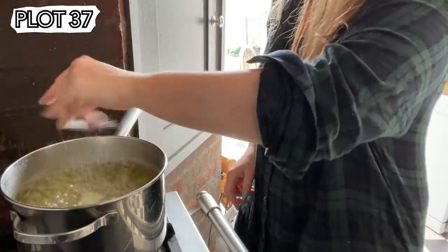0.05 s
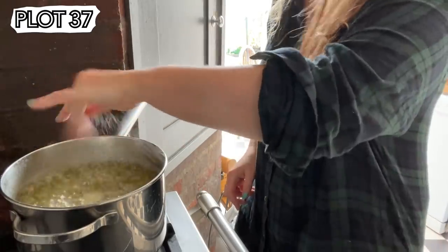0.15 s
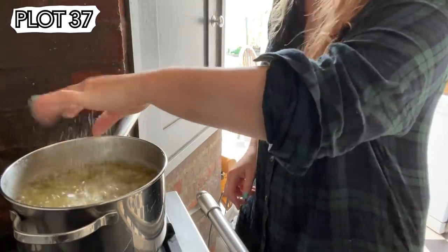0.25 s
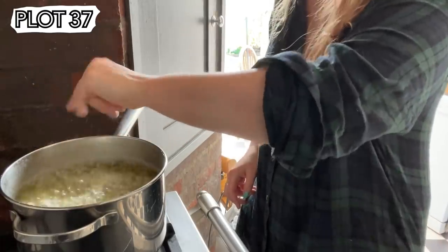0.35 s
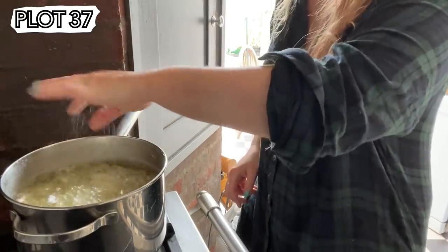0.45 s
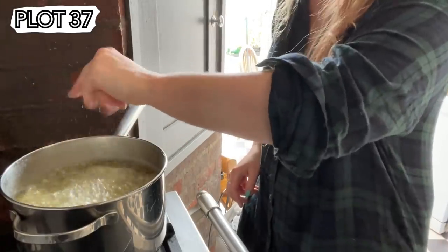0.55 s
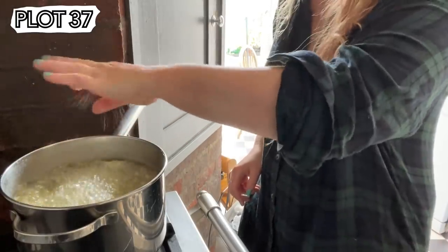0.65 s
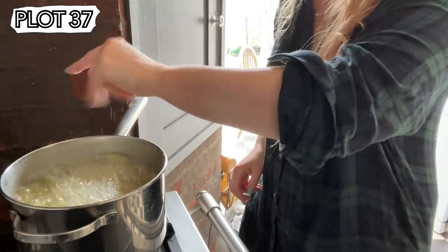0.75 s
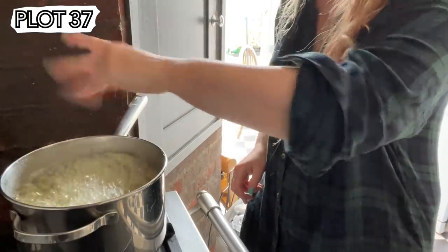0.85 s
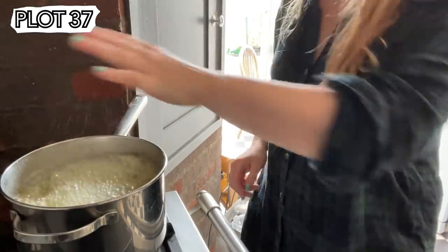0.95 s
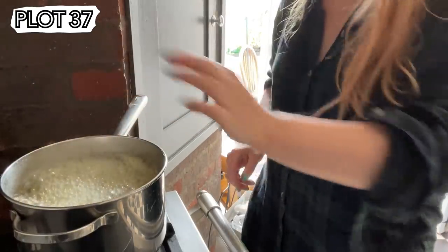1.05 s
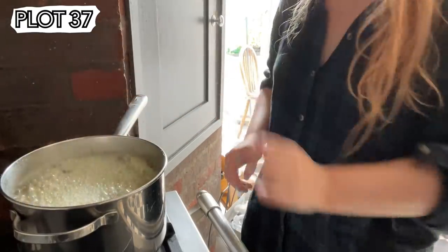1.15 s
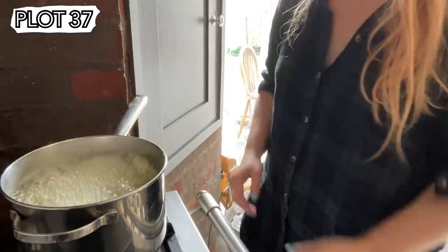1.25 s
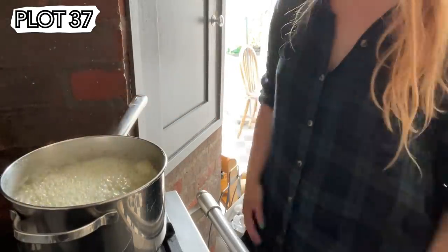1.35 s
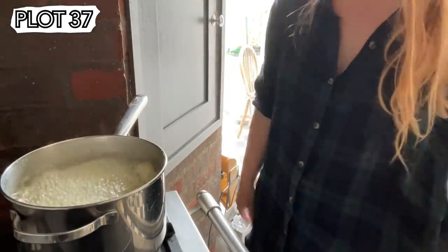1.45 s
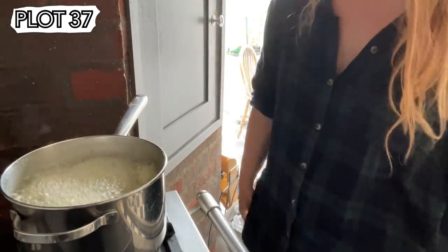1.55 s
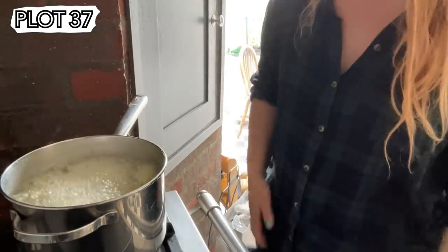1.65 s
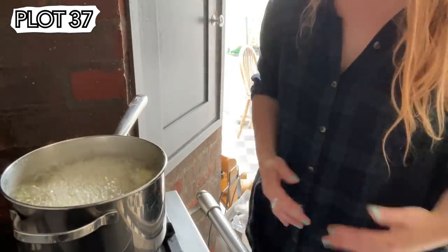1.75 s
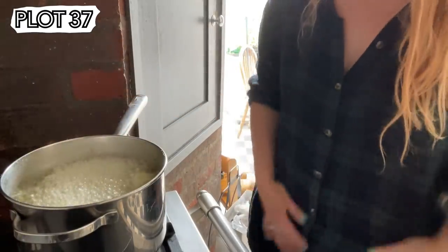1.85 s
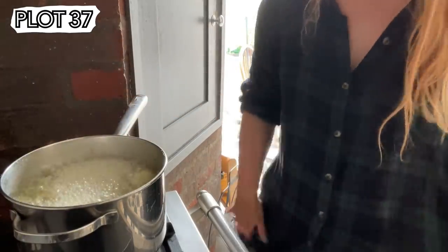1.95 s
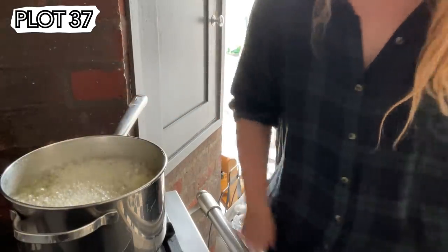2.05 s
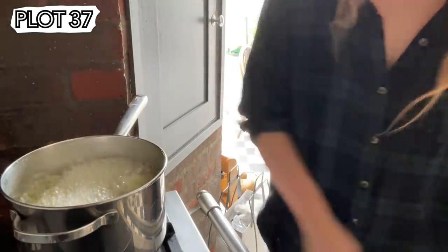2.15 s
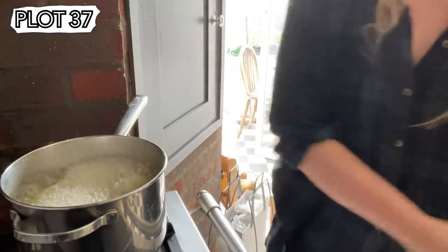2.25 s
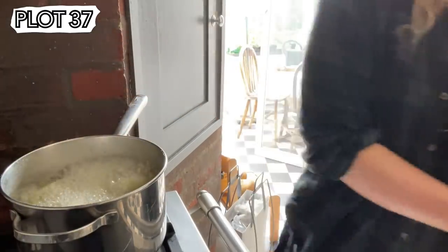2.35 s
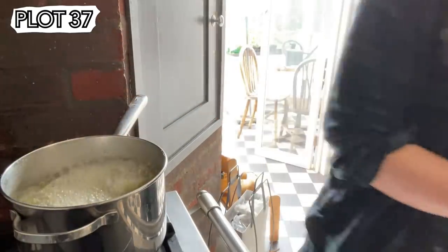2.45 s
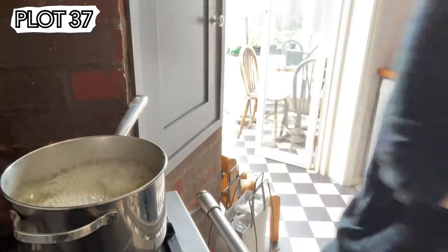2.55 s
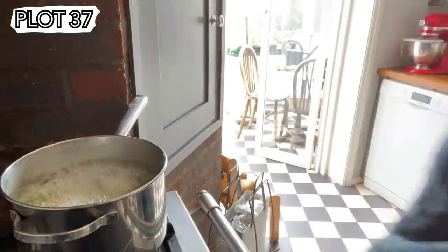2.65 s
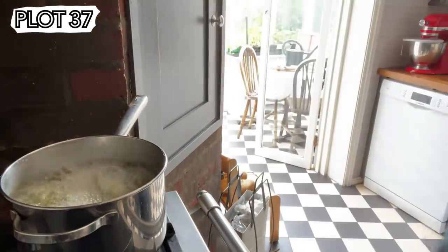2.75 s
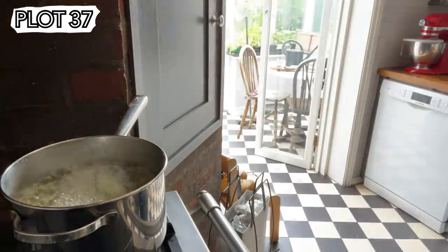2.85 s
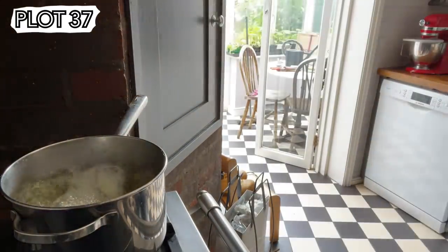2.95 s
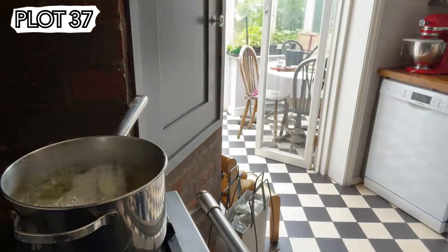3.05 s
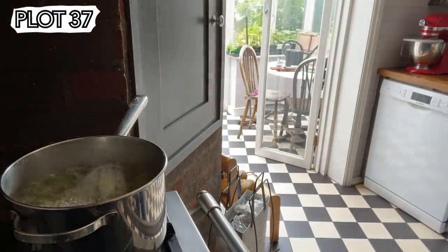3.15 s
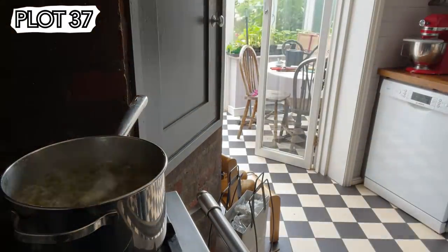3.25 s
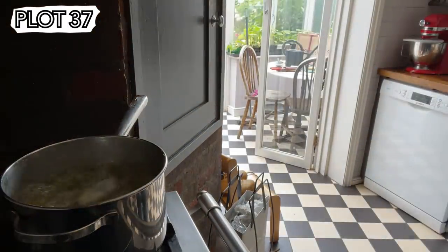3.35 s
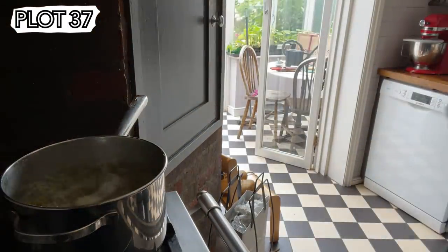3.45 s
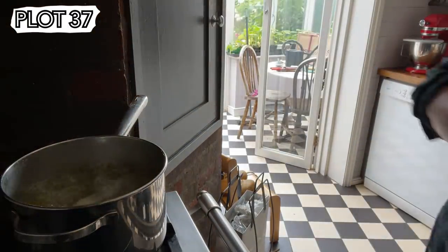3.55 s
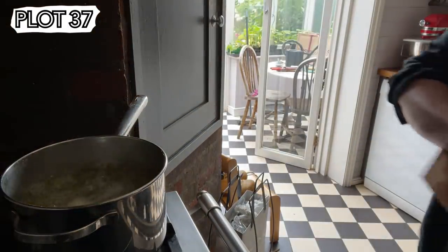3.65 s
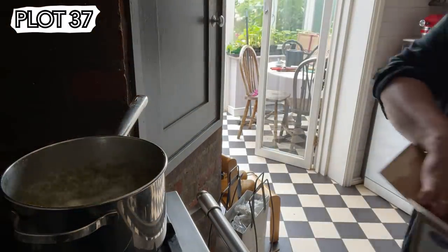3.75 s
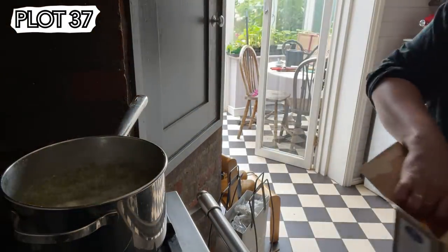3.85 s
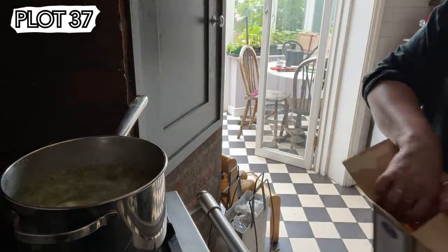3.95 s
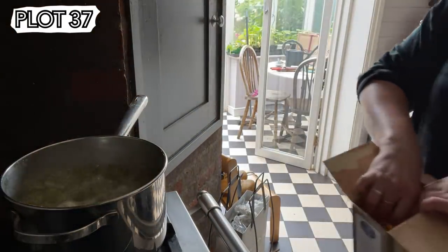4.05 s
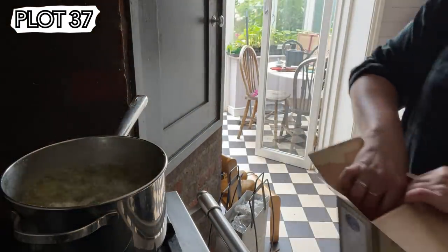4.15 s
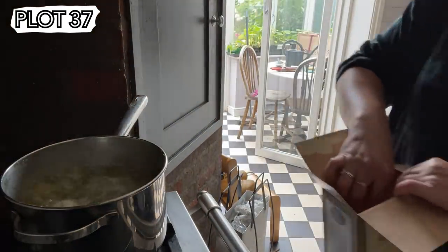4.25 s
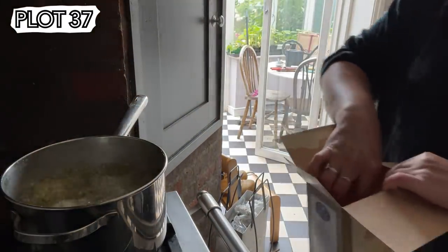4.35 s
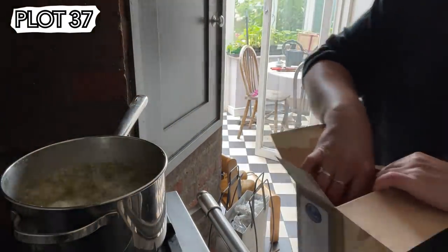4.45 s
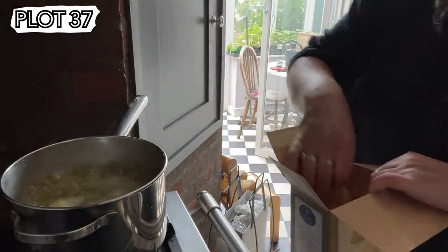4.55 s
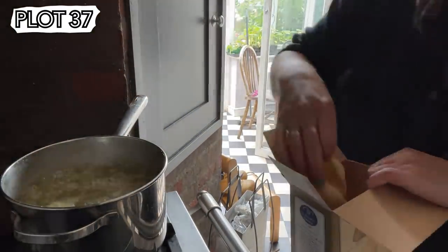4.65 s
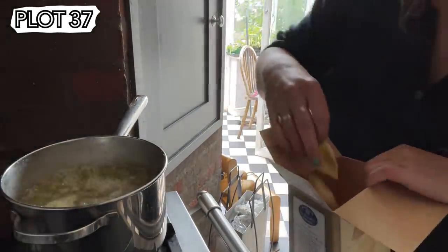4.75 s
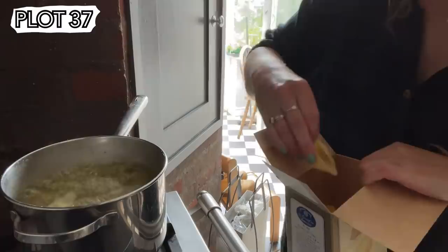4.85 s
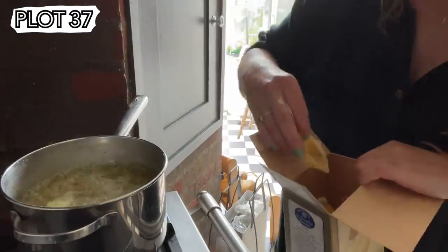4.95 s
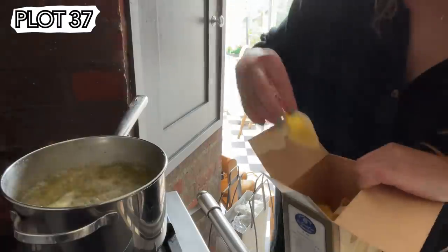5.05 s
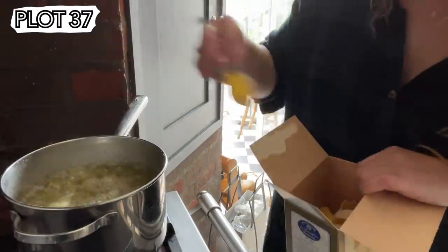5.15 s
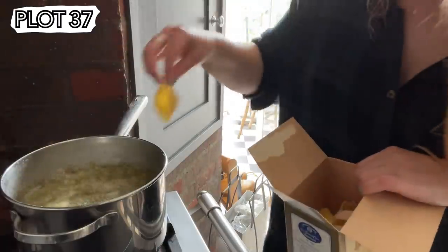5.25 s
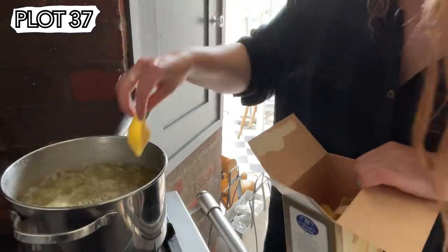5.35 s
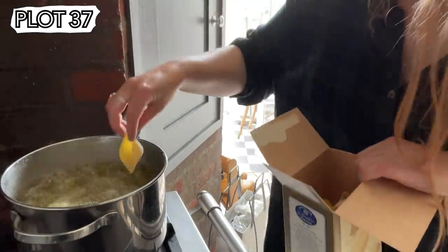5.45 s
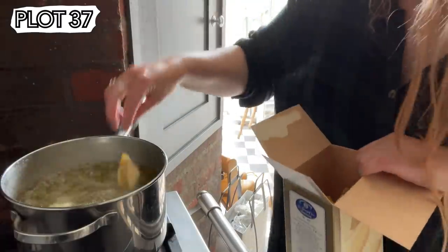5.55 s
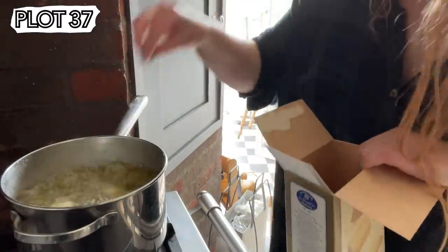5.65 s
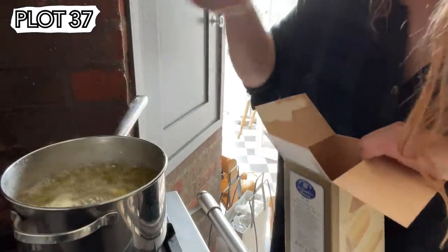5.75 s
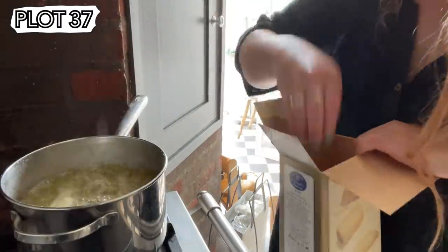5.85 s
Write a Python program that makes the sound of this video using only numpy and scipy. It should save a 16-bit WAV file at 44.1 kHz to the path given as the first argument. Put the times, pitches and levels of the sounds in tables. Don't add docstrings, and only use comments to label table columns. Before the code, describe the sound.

Close stereo capture in a small tiled kitchen. A steel pot bubbles throughout with low throbs and a faint metallic ring. Salt makes it gurgle harder and foam into a bright hiss, gone by about a second and a half. Soft hand slaps on cloth and dull thumps follow, then mostly boiling alone. Later a cardboard box arrives with hollow knocks, and dry pasta rattles and clacks inside it before small taps at the pot.

```python
import sys
import numpy as np
from scipy import signal
from scipy.fft import rfft, irfft, next_fast_len
from scipy.io import wavfile
from scipy.ndimage import uniform_filter1d

SR = 44100
rng = np.random.default_rng(int(sys.argv[2]) if len(sys.argv) > 2 else 0)


def volts_from_db(level):
    exponent = np.asarray(level, float) / 20
    return 10 ** exponent


def persist_wave(psi):
    counts = np.round(np.clip(psi, -1, 1) * 32767).astype(np.int16)
    wavfile.write(sys.argv[1], SR, np.atleast_2d(counts).T)


N = 260807

# (time [s], stir above the calm boil [dB])
SALT_STIR = [
    (0, 7.5),
    (.15, 5),
    (.25, 15),
    (.33, 10),
    (.47, 13.5),
    (.56, 12),
    (.68, 9),
    (.9, 14),
    (1.15, 7),
    (1.6, 4.5),
]
# (frequency [Hz], width [Hz], level [dB])
BOARD_MODES = [(265, 61, -2), (363, 23.7, 1.5), (450, 84, -3.5), (758, 130, -4.5), (929, 25, -6.5),
               (1220, 294, -4), (1710, 190, -3), (2200, 550, -6.5), (2990, 64, 3), (4230, 1900, -22),
               (4750, 314, -20)]
# (time [s], lag [samples])
POT_SIDE = [(0, -4), (2, -3)]


def boil():
    # (frequency [Hz], width [Hz], level [dB])
    column_modes = [(67.6, 26.8, -3), (86, 13.5, 2.5), (121.4, 21.7, -6.5)]
    # (time [s], level [dB], rise and fall per 20 dB [s])
    heaves = [(.05, -46.5, 0), (.16, -41.5, 0.3), (.47, -46.5, 1.1), (.73, -39, 0.07), (0.811, -32, -0.08),
              (1.03, -45.5, 0.6), (1.31, -39.5, 0.33), (1.57, -36.5, 0.1), (1.742, -52, 3.2),
              (1.89, -43, .5), (2.3, -46.5, 3), (2.5, -58, 1.3), (2.68, -42.5, 0.75), (3.12, -44.5, 0.2),
              (3.27, -48, 0.8), (3.42, -51.5, 0.6), (3.65, -45, 0.8), (3.87, -37, 0), (4.01, -26.5, -0.04),
              (4.16, -44, 0.34), (4.36, -37, 0.06), (4.51, -44.5, 0.27), (4.59, -38, 0.34),
              (4.75, -33, -0.3), (4.85, -36, 0.14), (4.97, -41.5, 0.24), (5.1, -38.5, 0.1),
              (5.26, -46, -0.5), (5.34, -43, 0.15), (5.43, -41.5, 0.55), (5.75, -41.5, 0.5)]
    # (frequency [Hz], level per Hz [dB])
    simmer_spectrum = [(110, -22), (180, -5), (260, 3), (420, -7), (600, -7), (1000, -7), (1500, -12),
                       (2100, -12), (4500, -36), (6000, -48.5)]
    # (frequency [Hz], width [Hz], level [dB])
    wall_modes = [(262, 30, -2), (360, 35, -6), (450, 45, -8), (640, 40, -8), (760, 70, -5), (990, 30, -9),
                  (1075, 35, -3), (1128, 21, 5), (1192, 21, 2.5), (1385, 40, -13), (3190, 70, -11),
                  (3245, 28, -10), (5698, 32, -6), (6885, 36, -6.5)]
    (stir_db,), (s, db, length) = in_time(SALT_STIR), np.transpose(heaves)

    low_band = signal.butter(2, [42, 165], "band", fs=SR, output="sos")
    throb = unit(signal.sosfilt(low_band, body(grains(400, 1.0), column_modes)))
    throb = unit(throb / (uniform_filter1d(throb[0] ** 2, size=SR // 20) + 0.1) ** 0.28)
    throb_gain = np.hypot(volts_from_db(-52.5), humps(s, db, length, length))

    simmer = patchy(grains(3000, 2.5), simmer_spectrum, patchy_db=0.6)
    simmer_gain = volts_from_db(-55.5 + 0.28 * stir_db)

    ring = unit(body(body(grains(6000, 1.16), [(1180, 3000, 0)]), wall_modes))
    ring = unit(ring / (uniform_filter1d(ring[0] ** 2, size=SR // 14) + 0.22) ** 0.21)
    ring_gain = volts_from_db(-52.5 - 0.5 * np.arange(N) / SR + 0.6 * drift(6))
    return throb_gain * throb + simmer_gain * simmer + ring_gain * ring


def gurgles():
    (stir_db,) = in_time(SALT_STIR)
    pops, dealt = grains(1800, 2.0), rng.integers(0, 16, N)
    rings = 0
    for k, hz in enumerate(np.geomspace(420, 2900, num=16)):
        own = pops * (dealt == k) + 1e-18
        rings = rings + resonate(resonate(own, hz, 0.089 * hz), hz, 0.36 * hz) * hz ** -0.35
    rings = rings + volts_from_db(1.5) * resonate(rings, 748, 70)
    return volts_from_db(-63.5 + stir_db) * unit(rings)


def plops():
    # (time [s], peak level [dB], frequency [Hz])
    bubbles = [(.169, -48, 1680), (.195, -43, 735), (.232, -44, 1000), (.246, -46, 1335), (.362, -50, 1570),
               (.402, -52, 2220), (.406, -52, 1399), (.419, -47, 1442), (.458, -45, 1658),
               (.472, -50, 2390), (.5, -45, 740), (.963, -47, 1399), (1.192, -49, 1399),
               (2.262, -53.5, 796), (2.598, -48, 770), (.243, -39, 940), (.288, -47, 1720),
               (.365, -47, 2010), (.403, -45, 1660), (.415, -49, 1750), (.448, -49, 770), (.505, -40, 1150),
               (.544, -47, 2050), (.567, -43, 4100), (.57, -49, 770), (.592, -44, 1136),
               (.612, -43.5, 1147), (.645, -46.5, 1840), (.675, -57, 1180), (.686, -47, 3789),
               (.69, -47, 2010), (2.2155, -52, 1490), (2.218, -53, 1830), (2.6935, -45, 1060),
               (2.697, -49, 1060)]
    return volts_from_db(-1.5) * blips(bubbles, POT_SIDE, rise=0.0015, t60=0.065, climb=1.9)


def foam():
    # (frequency [Hz], level per Hz [dB])
    fizz_spectrum = [(760, -29), (1300, -6), (2100, -6), (4000, -1), (6400, 0), (7900, -2.5), (9500, -5.5),
                     (11000, -6), (14200, -3.5), (15900, -8)]
    # (time [s], level above the calm fizz [dB])
    swell = [(0, 0), (.33, 0.5), (.4, 7), (.67, 8.5), (.715, 16), (.76, 20), (.93, 19), (1.05, 19.5),
             (1.14, 17.5), (1.37, 18.5), (1.46, 7), (1.54, 6.5), (1.9, -0.5), (2.1, -0.5), (2.6, 0.5),
             (2.9, 2.5), (5.4, 0.5), (5.9, 2.5)]
    # (time [s], fizz level [dB], finest bubbles' level [dB])
    spits = [(.062, -68, -60), (.76, -53, -46), (1.07, -45, -40), (1.325, -56, -39), (1.6, -50.5, -54.5),
             (1.89, -52.5, -58), (2.33, -74, -62), (2.97, -60.5, -71), (3.22, -67, -58), (3.38, -63, -58),
             (3.59, -57, -57), (3.98, -51.5, -63), (4.13, -66, -58), (4.29, -52, -56), (4.55, -60, -52),
             (4.59, -64, -50.5), (5.23, -85, -58), (5.575, -61, -62.5)]
    spit_rise_s, spit_fall_s = 0.045, 0.14
    (swell_db,), (s, fizz_db, finest_db) = in_time(swell), np.transpose(spits)

    flicker_db = 0.84 / (0.5 + 0.084 * np.maximum(swell_db, 0))
    fizz = patchy(grains(14000, 2.9), fizz_spectrum, patchy_db=flicker_db)
    top = signal.sosfilt(signal.butter(4, 9200, "high", fs=SR, output="sos"), fizz)
    low = signal.sosfilt(signal.butter(4, 9200, "low", fs=SR, output="sos"), fizz)
    low_gain = np.hypot(volts_from_db(-59.5 + swell_db), humps(s, fizz_db, spit_rise_s, spit_fall_s))

    fade_db = 59 * np.arange(N) / SR
    linger_db = np.maximum.accumulate(0.056 * swell_db ** 2 + fade_db) - fade_db
    top_gain = np.hypot(volts_from_db(-62 + linger_db), humps(s, finest_db, spit_rise_s, spit_fall_s))
    return low_gain * unit(low) + top_gain * unit(top)


def handling():
    # (peak time [s], board level [dB], rise to -20 dB [s], fall to -20 dB [s],
    # scratch against the board [dB])
    cloth = [(1.265, -50, -0.13, 0.33, -25), (1.536, -55.5, 0.3, 0.7, -6), (1.6, -36, 0.04, -0.12, -12.5),
             (1.875, -49.5, -0.27, 0.35, -3), (2.22, -58.5, 0.6, 0.4, -21), (2.65, -57, 1.2, 5, -22),
             (2.72, -65.5, -1, -1.6, 7), (2.98, -62, -3, -8.5, -2)]
    carry = [(3.21, -43.5, 0.068, 0.055, -4), (3.39, -48, 0.046, 0.097, -4),
             (3.52, -44.5, 0.055, 0.1, -5.5), (3.67, -48, 0.091, 0.2, -3.5), (3.94, -46.5, 0.08, 0.11, -5)]
    dig = [(4.02, -48.5, 0.056, 0.12, -1.5), (4.19, -49.5, 0.21, 0.25, -4), (4.3, -43, 0.072, 0.11, -2),
           (4.36, -42, 0.031, 0.051, -6), (4.44, -48.5, 0.08, 0.12, -3), (4.505, -39, 0.032, 0.12, -3.5),
           (4.575, -38.5, 0.054, 0.11, -1.5), (4.72, -49.5, 0.2, 0.2, -2), (4.795, -43, 0.016, 0.022, 4),
           (4.835, -40, 0.035, 0.056, 1.5), (4.89, -46, .08, 0.21, -5.5), (4.97, -43.5, 0.044, 0.059, 0),
           (5.08, -49, 0.1, 0.097, -4.5), (5.25, -54.5, 0.31, 0.62, -30), (5.47, -57, 0.21, 0.045, -4),
           (5.575, -52.5, 0.019, 0.086, -4), (5.72, -56, 0.14, 0.58, -12)]
    crispness = {"cloth": -16, "carry": -17, "dig": -13}
    s, board_db, rise, fall, scratch_db = np.transpose(cloth + carry + dig)
    crisp_db = np.repeat(list(crispness.values()), [len(cloth), len(carry), len(dig)])
    scratch_db = board_db + scratch_db

    slips = grains(2500 * volts_from_db(2.5 * drift(40)), 2.4)
    slips = slips / (uniform_filter1d(slips ** 2, size=SR // 40) + 0.11) ** 0.34
    board = humps(s, board_db, rise, fall, order=2) * unit(body(slips, BOARD_MODES[:5]))
    scratch = humps(s, scratch_db + 1.5, rise, fall, order=2) * unit(body(slips, BOARD_MODES[5:8]))
    crisp = humps(s, scratch_db + crisp_db, rise, fall, order=2) * unit(body(slips, BOARD_MODES[8:]))
    return board + scratch + crisp


def box_knocks():
    # (time [s], peak level [dB], ring [Hz], ring width [Hz], tail t60 [s])
    light = [(1.29, -41, 437, 120, .12), (1.335, -36, 405, 150, 0.14), (1.5795, -26.5, 394, 220, 0.52),
             (1.590, -51, 397, 200, 0.28), (1.858, -25, 1280, 500, 0.088), (1.8625, -26.5, 960, 620, 0.15),
             (1.863, -25, 620, 200, 0.22), (1.8635, -28, 4070, 1500, 0.22), (4.292, -25, 2020, 600, 0.23),
             (4.293, -30, 4140, 800, .05), (4.4955, -32, 3000, 2500, .03),
             (4.7848, -29, 12000, 5000, 0.035), (4.7856, -42, 8440, 1204, .04),
             (4.8195, -36.5, 5000, 2500, .05), (4.823, -24.5, 265, 79.5, 0.055),
             (4.846, -28.5, 760, 195, 0.59), (4.9548, -22.5, 2070, 302, 0.27),
             (4.9552, -40, 3700, 603, 0.065), (4.985, -36, 2270, 120, 0.18), (5.139, -39, 1920, 400, 0.07)]
    heavy = [(3.155, -38.5, 418, 148, 0.093), (3.195, -33, 358, 120, 0.1), (3.2135, -36, 1300, 1200, .08),
             (4.499, -32, 413, 200, 0.17), (4.7848, -26, 3720, 200, 0.16), (4.7868, -19, 2200, 486, 0.71),
             (4.835, -30, 2900, 302, 0.27), (5.088, -37, 1830, 905, 0.084)]
    # (time [s], peak level [dB], frequency [Hz])
    nudges = [(1.67, -45, 420), (3.171, -45, 861), (3.353, -40, 690), (3.495, -42, 344), (3.711, -43, 409),
              (4.018, -42, 775), (4.023, -45, 596), (4.039, -47, 565), (4.073, -47, 855), (4.2, -41.5, 353),
              (4.296, -35.5, 366), (4.348, -39, 318), (4.451, -44.5, 394), (4.542, -37, 334),
              (4.585, -35, 324), (4.605, -41, 376), (4.614, -41.5, 800), (4.7845, -41.5, 882),
              (4.855, -39, 465), (4.88, -40, 753), (4.892, -44, 409), (4.962, -51, 806), (4.989, -44, 382)]
    # (time
    # [s], peak level [dB], frequency [Hz])
    clacks = [(1.253, -44, 760), (1.265, -41, 486), (1.268, -38.5, 850), (1.292, -38, 450),
              (1.326, -33, 1750), (3.2075, -32, 980), (3.24, -38, 1140), (3.241, -52, 2790),
              (5.681, -47, 2480), (1.8675, -33.5, 910), (1.874, -33, 1106), (1.8803, -43, 756),
              (1.894, -45, 784), (3.1907, -40, 3010), (3.52, -43, 2080), (3.539, -34, 780),
              (3.6421, -46.5, 2660), (3.6544, -47, 2620), (3.655, -35, 1100), (3.678, -46, 2300),
              (3.692, -41, 2050), (3.997, -39, 1130), (4.02, -51, 2040), (4.103, -49, 894),
              (4.3075, -43, 824), (4.3147, -39.5, 910), (4.3561, -43, 2770), (4.4983, -43, 3070),
              (4.523, -47, 3100), (4.5317, -35, 900), (4.5462, -30.5, 2800), (4.5556, -34, 770),
              (4.5585, -46, 4530), (4.5607, -33, 1550), (4.5629, -41, 2910), (4.5687, -32, 2760),
              (4.5752, -35, 1370), (4.5774, -37, 2800), (4.5861, -41, 2840), (4.5897, -35, 1380),
              (4.6195, -51, 4640), (4.679, -44, 3000), (4.7987, -39, 1400), (4.8045, -37.5, 1750),
              (4.8212, -48.5, 4440), (4.8214, -37, 3080), (4.8219, -36, 1410), (4.8256, -34, 750),
              (4.8336, -48, 5330), (4.8386, -29, 2100), (4.8401, -40, 745), (4.851, -35, 1860),
              (4.859, -34, 2130), (4.9692, -40, 2280), (4.978, -41, 3180), (4.9787, -43, 2210),
              (4.991, -49, 4030),
              (1.8622, -38, 2750), (1.8622, -39, 2000), (3.196, -50, 1940), (3.592, -52, 2600),
             (3.593, -48, 1690), (3.238, -44, 1550), (3.518, -46.5, 3030), (3.516, -51, 2090),
             (3.636, -47, 2239), (3.69, -45, 1959), (3.988, -49, 2700), (4.002, -46, 2520),
             (4.013, -45, 3240), (4.259, -53, 2045), (4.266, -52, 3800), (4.308, -50, 2800),
             (4.314, -44, 2024), (4.549, -39, 3251), (4.596, -41, 1670), (4.663, -46, 3036),
             (4.74, -41, 1360), (4.789, -44, 2605), (4.837, -40.5, 3070), (4.848, -42, 3060),
             (4.858, -33, 2190), (4.8375, -35, 2250), (4.97, -40, 2290), (4.8715, -42, 2250),
             (4.955, -38, 1690), (4.957, -41.5, 3870), (4.96, -35, 2140), (5.003, -47, 3273),
             (5.136, -48.5, 1710), (5.574, -46, 1335)]
    # (time [s], lag [samples])
    box_side = [(1.9, 10), (3.1, 20), (3.55, 19), (3.64, 13), (4.2, 11), (4.6, 10), (4.8, 9), (4.86, 7),
                (4.96, 8), (4.99, 4), (5.14, -3)]
    struck = taps(light, box_side, board_db=-15) + taps(heavy, box_side, board_db=-5.5)
    dull = blips(nudges, box_side, rise=0.0033, t60=0.057, climb=0)
    return struck + dull + blips(clacks, box_side, rise=0.0007, t60=0.044, climb=0)


def pot_taps():
    # (time [s], peak level [dB], ring [Hz], ring width [Hz], tail t60 [s])
    drips = [(2.2112, -34, 1460, 600, 0.061), (2.6888, -33.5, 830, 398, 0.066),
             (5.255, -44, 2080, 300, .05), (5.573, -32, 2500, 2000, 0.1), (5.6743, -30, 1360, 1500, 0.12)]
    return taps(drips, POT_SIDE, board_db=-33)


def thumps():
    # (time [s], peak level [dB], frequency [Hz], rise [s], t60 [s])
    steps = [
        (1.276, -26, 66, 0.044, 0.18),
        (1.363, -30, 64, 0.012, 0.14),
        (2.701, -31.5, 47.3, 0.04, 0.13),
    ]
    out = np.zeros(N)
    for s, db, hz, rise, t60 in steps:
        t = np.maximum(np.arange(N) / SR - s, 0)
        decay = volts_from_db(db - 60 * np.maximum(t - rise, 0) / t60)
        out += decay * np.minimum(t / rise, 1) * np.sin(2 * np.pi * hz * t)
    return out


def kitchen(x):
    t60_s, wall_cut_hz = 0.16, 1400
    size = next_fast_len(N + SR)
    hz, walls = np.fft.rfftfreq(size, 1 / SR), np.zeros((2, size // 2 + 1), complex)
    for k, lag in enumerate(rng.uniform(0.0084, 0.1, 10)):
        loop = volts_from_db(-60 * lag / t60_s) * np.exp(-2j * np.pi * hz * lag) / (1 + 1j * hz / wall_cut_hz)
        walls[k % 2] += loop / (1 - loop) * (-1) ** (k // 2)
    return irfft(walls * rfft(x, size), size)[:, :N]


def ports(pair, phase):
    # (frequency [Hz], likeness of the ports [0-1])
    likeness = [(60, 0.98), (130, 0.84), (300, 0.78), (600, 0.35), (1200, 0.5), (3000, 0.42), (7000, 0.45),
                (9500, 0.65), (10500, .72), (11200, .99), (12900, 0.99), (14000, .55), (15500, .45)]
    # (frequency [Hz], left over right [dB])
    left_louder = [(60, 5), (180, 4), (550, 0.5), (1650, 0.5), (4970, 2), (15000, -1)]
    size = next_fast_len(N)
    hz, (near, diffuse) = np.fft.rfftfreq(size, 1 / SR), rfft(pair, size)
    alike, tilt = np.clip(at_hz(likeness, hz), 0, 1), volts_from_db(at_hz(left_louder, hz) / 2)
    right = alike * near * np.exp(-1j * at_hz(phase, hz)) + np.sqrt(1 - alike ** 2) * diffuse
    return irfft(np.array([near * tilt, right / tilt]), size)[:, :N]


def taps(rows, lag, board_db):
    out, t = np.zeros((2, N + SR)), np.arange(SR // 4) / SR
    for s, db, hz, width, t60 in rows:
        tail = 0.05 * volts_from_db(-60 * t / t60) + 0.06 * volts_from_db(-60 * t / 0.02)
        rattle = rng.standard_normal((2, len(t))) * tail
        rattle[:, :3] += [0.5, 1, 0.5]
        ring = resonate(resonate(rattle, hz, 0.78 * width), hz, 3 * width)
        board = body(rattle, BOARD_MODES)
        sound = volts_from_db(db) * (ring / np.abs(ring).max() + volts_from_db(board_db) * board / np.abs(board).max())
        for side, at in enumerate(arrivals(s, lag)):
            out[side, at:at + len(t)] += sound[side]
    return out[:, :N]


def blips(rows, lag, rise, t60, climb):
    out, t = np.zeros((2, N + SR)), np.arange(SR // 10) / SR
    shape = (1 - np.exp(-t / rise)) * volts_from_db(-60 * t / t60)
    for s, db, hz in rows:
        sound = volts_from_db(db) * shape / shape.max() * np.sin(2 * np.pi * hz * (t + climb * t * t / 2))
        for side, at in enumerate(arrivals(s, lag)):
            out[side, at:at + len(t)] += sound
    return out[:, :N]


def arrivals(s, lags):
    lag = round(np.interp(s, *np.transpose(lags)))
    return round(s * SR) + lag - lag // 2, round(s * SR) - lag // 2


def humps(s, db, rise, fall, order=1):
    t, power = np.arange(0, N + 32, 32) / SR, 0
    for at, top, up, down in np.broadcast(s, db, rise, fall):
        away = np.maximum((at - t) / max(up, 1e-3), (t - at) / max(down, 1e-3))
        power = power + volts_from_db(2 * (top - 20 * away ** order))
    return np.interp(np.arange(N) / SR, t, np.sqrt(power))


def patchy(pair, spectrum, patchy_db):
    size = next_fast_len(N)
    hz, out, shared = np.fft.rfftfreq(size, 1 / SR), 0, drift(3.4)
    coloured = rfft(pair, size) * volts_from_db(at_hz(spectrum, hz))
    octave = np.log2(hz + 1)
    for centre in np.arange(np.log2(spectrum[0][0]) - 1, np.log2(spectrum[-1][0]) + 1):
        band = np.cos(np.pi / 2 * np.clip(octave - centre, -1, 1)) ** 2
        flicker = volts_from_db(patchy_db * (0.7 * shared + drift(21)))
        out = out + irfft(coloured * band, size)[:, :N] * flicker
    return unit(out)


def body(x, modes):
    return sum((-1) ** k * volts_from_db(db) * resonate(x, hz, width) for k, (hz, width, db) in enumerate(modes))


def resonate(x, hz, width):
    r = np.exp(-np.pi * width / SR)
    poles = [1, -2 * r * np.cos(2 * np.pi * hz / SR), r * r]
    return signal.lfilter([(1 - r * r) / 2, 0, (r * r - 1) / 2], poles, x)


def grains(per_s, spread_db):
    sizes = volts_from_db(spread_db * np.minimum(rng.exponential(1, (2, N)), 4)) * rng.choice([-1, 1], (2, N))
    return unit(sizes * (rng.random((2, N)) < per_s / SR)) + 1e-18


def drift(rate):
    r = np.exp(-80 * np.pi * rate / SR)
    slow = signal.lfilter([1], [1, -2 * r, r * r], rng.standard_normal(N // 40 + 2002))[2000:]
    return np.interp(np.arange(N) / 40, np.arange(len(slow)), unit(slow))


def in_time(rows):
    s, *columns = np.transpose(rows)
    return [np.interp(np.arange(N) / SR, s, c, left=-99) for c in columns]


def at_hz(points, hz):
    table_hz, values = np.transpose(points)
    return np.interp(np.log(hz + 1), np.log(table_hz + 1), values)


def unit(x):
    return x / np.sqrt(np.mean(x ** 2) + 1e-20)


def scene():
    # (frequency [Hz], phase [rad])
    pot_phase = [(60, 0), (300, 0), (600, 1.2), (900, .2), (1200, 0.1), (3400, 1.2), (6800, 2.5),
                 (8300, 3.9), (9600, 4.8), (11200, 6.28), (13500, 6.3), (15200, 8.1)]
    # (frequency [Hz], phase [rad])
    box_phase = [(60, 0), (300, -.4), (430, -.5), (700, -1.4), (1200, -2.2), (2400, -3.1), (3400, -4.1),
                 (6000, -8.5), (10500, -12.56), (16000, -12.56)]
    pot = ports(boil() + gurgles() + foam() + thumps(), pot_phase)
    box = volts_from_db(np.array([[-0.8], [0.8]])) * ports(handling(), box_phase)
    knocks = box_knocks() + pot_taps() + plops()
    return pot + box + knocks + volts_from_db(-7.0) * kitchen(knocks[0])


def low_pass(x):
    return signal.sosfilt(signal.butter(12, 16400, fs=SR, output="sos"), x)


def record(dry):
    fade = np.clip((5.850 - np.arange(N) / SR) / 0.004, 0, 1)
    top_cut = signal.cheby2(12, 60, 15900 + 150, fs=SR, output="sos")
    return low_pass(signal.sosfilt(top_cut, dry) * fade)


dry = scene()
out = record(dry)
persist_wave(out)
```